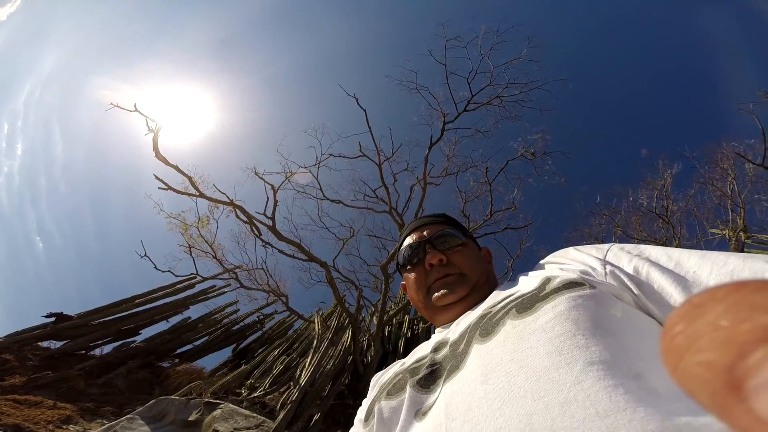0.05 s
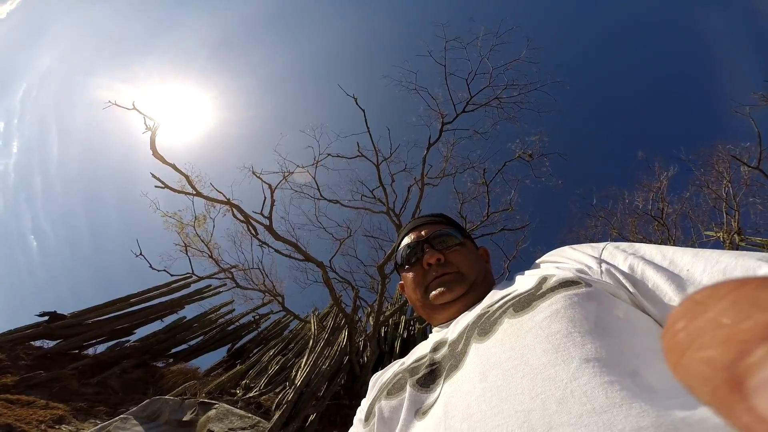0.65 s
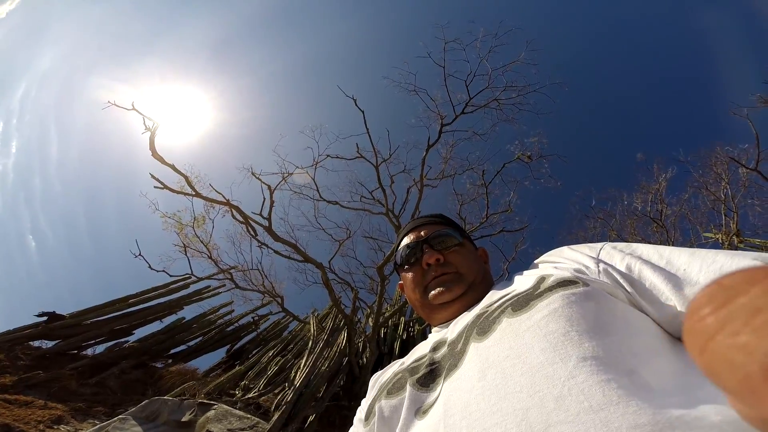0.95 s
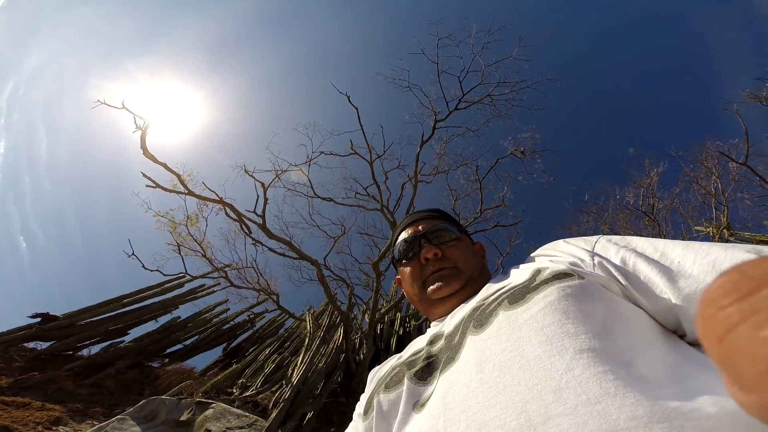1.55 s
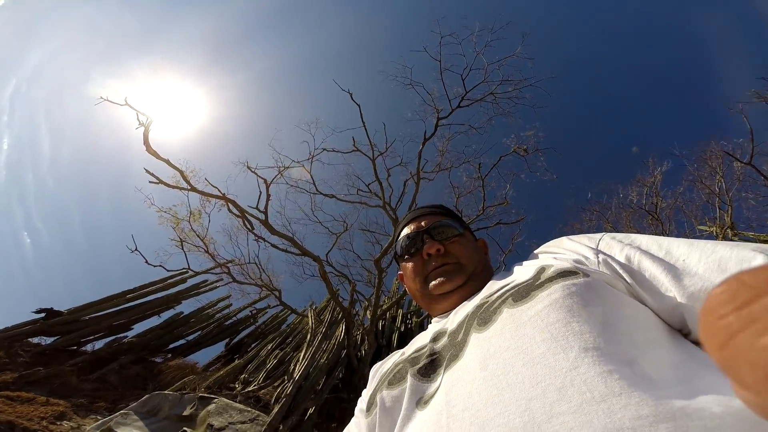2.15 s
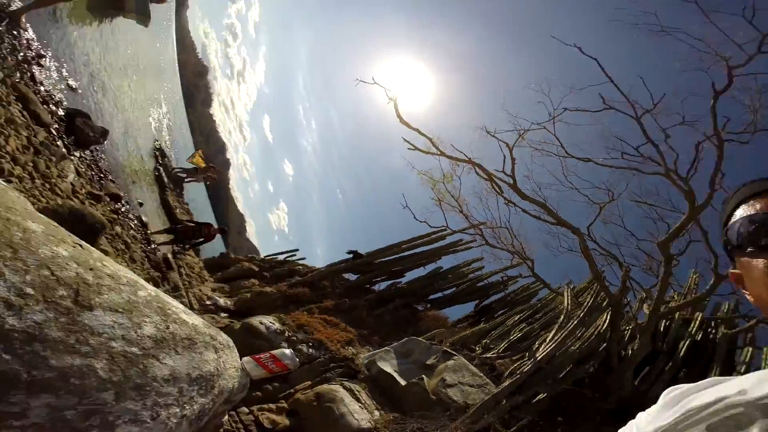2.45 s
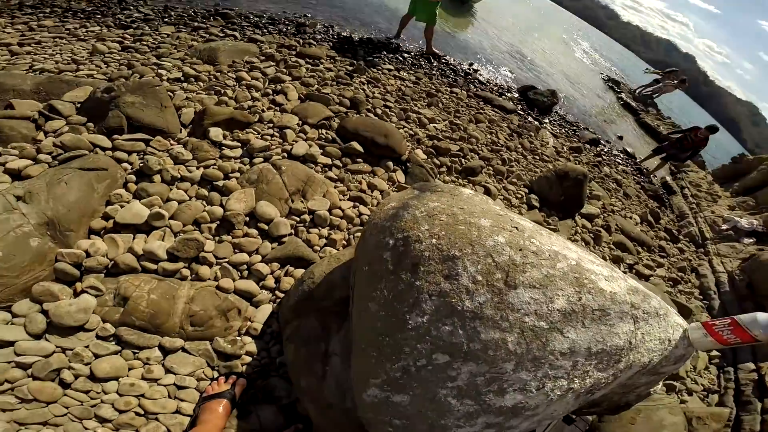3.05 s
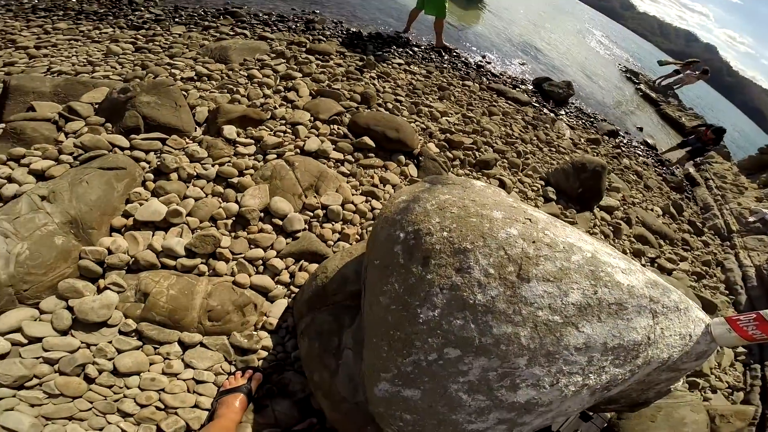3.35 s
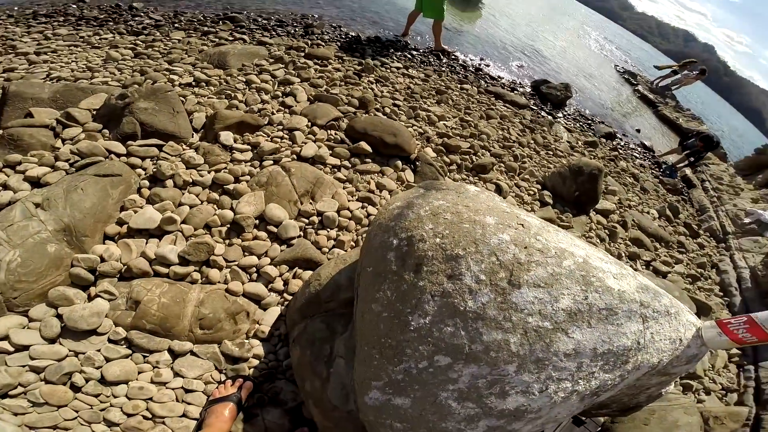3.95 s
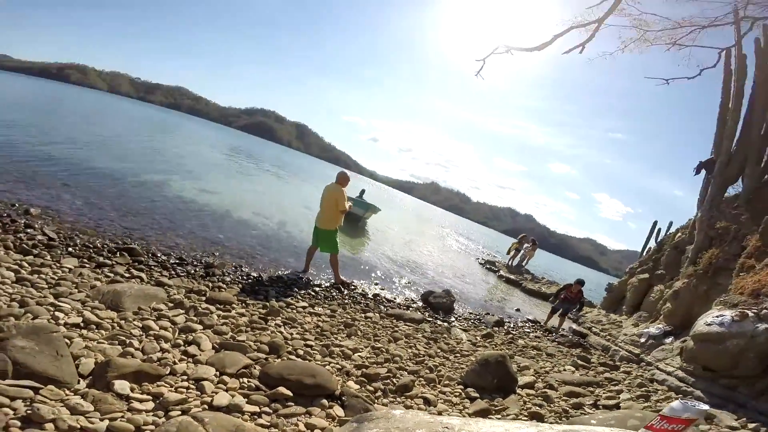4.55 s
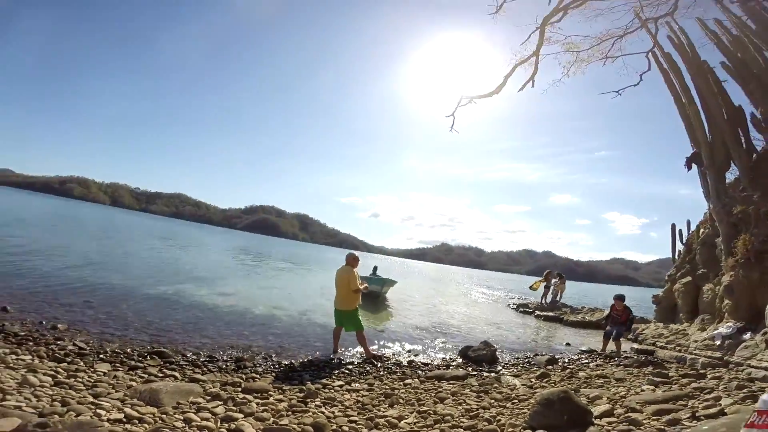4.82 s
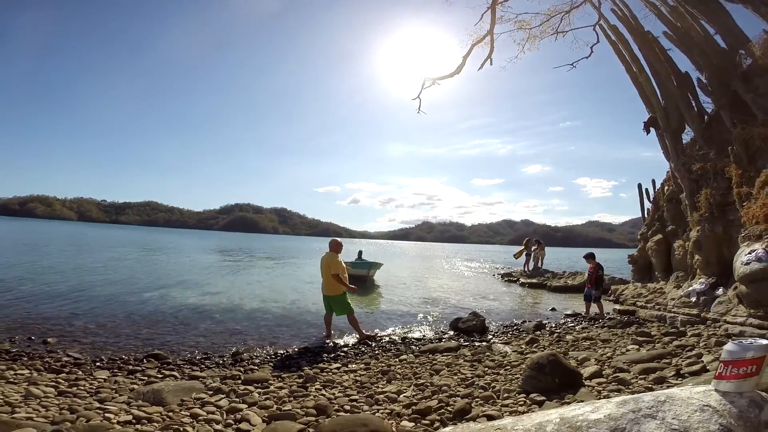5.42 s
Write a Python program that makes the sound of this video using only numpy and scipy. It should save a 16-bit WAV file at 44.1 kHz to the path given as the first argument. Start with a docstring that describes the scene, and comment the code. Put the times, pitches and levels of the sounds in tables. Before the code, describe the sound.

Fingers rub, tap and click on a handheld camera's plastic case, close and boxy, over a low rumble.

```python
"""A quiet shore: a small camera in a plastic waterproof housing is held and turned in the hand.
Fingers rub, squeak and tap on the case and its joint creaks and clicks; each rings the panels
and shakes the mount, heard through the air shut in the case. The grip adds pressure thumps.
Under it lie a low rumble, soft hiss and faint electronic whine; gain control ducks after loud knocks."""
import sys
import numpy as np
from scipy import signal
from scipy.fft import rfft, irfft, next_fast_len
from scipy.io import wavfile
from scipy.ndimage import uniform_filter1d, minimum_filter1d, map_coordinates

SR = 44100
rng = np.random.default_rng(int(sys.argv[2]) if len(sys.argv) > 2 else 0)


def generate_wav(signal):
    """Clip the signal to [-1, 1] and save it as 16-bit WAV at the path in sys.argv[1]."""
    frames = np.transpose(np.atleast_2d(signal))
    scaled = np.clip(frames, -1, 1) * 32767
    pcm = np.round(scaled).astype(np.int16)
    wavfile.write(sys.argv[1], SR, pcm)


N = 246078

# modes of the plastic walls: f/Hz, width/Hz, level/dB
WALL_MODES = [(407, 33, -30.5), (588, 68, -8), (738, 42, -2.5), (1124, 120, 5.5), (1487, 145, 3),
              (1805, 58, 3), (1994, 136, -2.5), (2310, 150, 1), (2590, 200, -5)]
# modes of the stiff corners: f/Hz, width/Hz, level/dB
CORNER_MODES = [(3074, 390, 1.5), (3440, 300, 7.5), (3580, 257, 8), (4160, 160, -3.5), (4533, 120, 0.5),
                (4900, 150, -8.5), (5556, 150, -11), (6260, 110, -6.5), (6290, 210, -9), (7280, 18, -22),
                (7370, 1100, -16), (9160, 230, -40), (10770, 820, -40.5), (13400, 2000, -35)]


def amp(db):
    """Decibels to gain."""
    return 10 ** (np.asarray(db) / 20)


def unit(x):
    """Scale to rms 1."""
    return x / np.sqrt(np.mean(x ** 2) + 1e-20)


def add(track, at_s, sound):
    """Mix a sound into a track."""
    part = track[max(round(at_s * SR), 0):][:len(sound)]
    part += sound[:len(part)]


def wobble(rate_hz):
    """Smooth random curve with knots at rate_hz."""
    knots = rng.standard_normal(int(N * rate_hz / SR) + 4)
    return map_coordinates(knots, [np.arange(N) * rate_hz / SR])


def filtered(x, response):
    """Apply a complex frequency response."""
    size = next_fast_len(len(x) + SR // 10)
    return irfft(rfft(x, size) * response(np.fft.rfftfreq(size, 1 / SR)), size)[:len(x)]


def soften(x, edge_hz, order):
    """Causal low-pass."""
    return signal.sosfilt(signal.butter(order, min(edge_hz, SR / 2 - 1), fs=SR, output="sos"), x)


def resonance(f, centre_hz, width_hz):
    """Response of one mode, 1 at its centre."""
    return 1j * f * width_hz / (centre_hz ** 2 - f * f + 1j * f * width_hz)


def resonate(force, modes, scatter_db):
    """Drive (f/Hz, width/Hz, level/dB) modes; the place of contact scatters their levels. Rms 1."""
    offset_db = rng.normal(0, 1, len(modes)) * scatter_db
    return unit(filtered(force, lambda f: sum((-1) ** k * amp(db + offset_db[k]) * resonance(f, hz, width)
                                              for k, (hz, width, db) in enumerate(modes))))


def ring(t, modes):
    """Struck (f/Hz, t60/s, level/dB) modes fade from random phases."""
    tones = sum(amp(db - 60 * t / t60_s) * np.sin(2 * np.pi * (hz * t + rng.random()))
                for hz, t60_s, db in modes)
    return tones * (1 - np.exp(-t / 0.00026))


def contact(t, decay_s, grit):
    """Force of one contact: a spike and a short crunch."""
    force = grit * rng.standard_normal(len(t)) * np.exp(-t / decay_s)
    force[0] += 1
    return force


def pressure(t, start_s, top_s, end_s):
    """Finger force through one stroke: builds to 1, then lets go."""
    return np.interp(t, np.sort([start_s, top_s, end_s]), [0, 1, 0]) ** 0.46


def rumble_and_hiss():
    """The hand-held case rumbles over the arm's deep sway, both rising in a swing; soft hiss above."""
    # noise spectrum: f/Hz, relative level/dB
    spectrum = [(12, -11.5), (20, 1), (30, -10), (97, -20.5), (128, -21.5), (328, -27.5), (433, -30),
                (511, -30.5), (674, -33), (1730, -38.5), (6010, -50), (11100, -60), (12000, -60),
                (15000, -67.5)]
    # camera swings: three corner times t/s (sorted: start, peak, end), sway rise/dB
    swings = [(2.25, 2.467, 3.35, 21.5), (3.745, 4.55, 4.5, 28), (4.572, 4.988, 9.8, 13.5)]
    t = np.arange(N) / SR
    hz, db = np.transpose(spectrum)
    colour = lambda f: amp(np.interp(np.log(f + 1), np.log(hz), db))
    low_share = lambda f: 1 / (1 + (f / 130) ** 4)
    rumble = unit(filtered(rng.standard_normal(N), lambda f: colour(f) * np.sqrt(low_share(f))))
    sway = unit(soften(filtered(rng.standard_normal(N), colour), edge_hz=35.9, order=3))
    hiss = unit(filtered(rng.standard_normal(N), lambda f: colour(f) * np.sqrt(1 - low_share(f))))
    swing_db = sum(np.interp(t, np.sort(times_s), [0, rise_db, 0]) for *times_s, rise_db in swings)
    handling = amp(0.63 * swing_db) * rumble + amp(swing_db - 9.5) * sway
    return amp(-43.5 + 1.4 * wobble(26.02)) * handling + amp(-54 + 0.6 * wobble(6.28)) * hiss


def whine():
    """Thin tones of the electronics, wavering in phase."""
    # tones: f/Hz, level/dB
    tones = [(5846, -79.5), (8780, -85), (11719, -79)]
    t = np.arange(N) / SR
    return sum(amp(db) * np.sin(2 * np.pi * hz * t + 0.3 * wobble(25)) for hz, db in tones)


def thumps():
    """The hand presses the case and lets go: one swing of pressure each."""
    # pushes: t/s, level/dB, f/Hz
    pushes = [(1.107, -32, 57), (2.401, -18.5, 250), (2.413, -15, 55), (2.438, -7.5, 21.6),
              (2.514, -13.5, 146), (2.849, -7, 23.7), (2.945, -14.5, 28), (4.28, -16.5, 26.4),
              (4.308, -16.5, 91), (4.341, -2.5, 49), (4.568, -14.5, 39)]
    out, t = np.zeros(N), np.arange(-SR // 10, SR // 10) / SR
    for at_s, db, hz in pushes:
        phase = 2 * np.pi * hz * t
        pulse = -phase / (1 + phase ** 2) ** 2
        add(out, at_s + t[0], amp(db) * pulse / pulse.max())
    return out


def rub(rise_s, fall_s, panel_hz, width_hz, panel_db, hard_db, hiss_db):
    """Skin sticks and slips on plastic: clumps of tiny grains ring a panel, the case and its mount."""
    n, clump_hz, grains_per_s = SR // 3, 150, 1600
    t = np.arange(n) / SR
    size, chance, fine = rng.standard_normal(n), rng.random(n), rng.standard_normal(n)
    clumps = amp(2.07 * np.interp(t * clump_hz, np.arange(n), rng.standard_normal(n)))
    grains = clumps * (size * (chance < grains_per_s / SR) + 0.063 * fine)
    panel = amp(panel_db) * resonate(grains, [(panel_hz, width_hz, 0)], scatter_db=0)
    skin = unit(soften(clumps * fine, edge_hz=1050, order=1))
    walls = resonate(grains, WALL_MODES, scatter_db=3)
    body = unit(soften(panel + walls + skin, edge_hz=3200, order=2))
    corners = resonate(grains, CORNER_MODES, scatter_db=5.5)
    edge = amp(hard_db) * unit(soften(corners, edge_hz=6400, order=3))
    hiss = unit(soften(clumps * grains, edge_hz=12000 * amp(0.26 * hiss_db), order=3))
    # what the panel does not take shakes the mount
    mount = amp(-2.5 - panel_db) * resonate(grains, [(221, 24, 0)], scatter_db=0)
    force = pressure(t, 0, rise_s, rise_s + fall_s)
    return amp(-1.5) * force * (body + edge + amp(hiss_db) * hiss + mount)


def rubs():
    """Finger strokes: a broad, gritty scrape."""
    # strokes: peak t/s, rise/s, fall/s, level/dB, panel f/Hz, hardness/dB, skin hiss/dB
    strokes = [(.78, 0.091, 0.041, -49, 1380, -8.5, -20), (.885, .04, .12, -52.5, 1430, -9, -18),
               (1.06, 0.058, 0.089, -54.5, 2630, -13, -11), (1.101, .03, 0.028, -42.5, 2500, -17, -7.5),
               (2.355, .04, 0.051, -46, 1650, -21, -19), (2.425, 0.026, 0.051, -33, 1760, -18.5, -12.5),
               (2.505, .04, 0.038, -36.5, 2150, -10.5, -16), (2.579, .018, 0.07, -35, 1550, -18, -26.5),
               (2.69, .075, 0.023, -27, 1314, -10.5, -16), (2.731, .025, 0.071, -39.5, 1450, -8, -21.5),
               (2.89, 0.024, 0.12, -43, 1392, -12, -34), (4.11, .025, 0.17, -41.5, 1430, -9.5, -18),
               (4.32, 0.051, 0.086, -32.5, 1290, -18, -15), (4.52, 0.099, 0.067, -36, 1270, -19.5, -20.5),
               (4.7, 0.13, 0.13, -45.5, 1240, -14.5, -17), (5.03, .04, 0.18, -53, 2043, -9, -6),
               (5.115, 0.032, .045, -39, 1274, -19, -27), (5.42, 0.17, 0.24, -56, 1670, -12.5, -12),
               (5.575, 0.056, .04, -40.5, 1500, -14, -29)]
    out = np.zeros(N)
    for top_s, rise_s, fall_s, db, hz, hard_db, hiss_db in strokes:
        scrape = rub(rise_s, fall_s, hz, width_hz=156, panel_db=-0.5, hard_db=hard_db, hiss_db=hiss_db)
        add(out, top_s - rise_s, amp(db) * scrape)
    return out


def squeaks(rise_s=0.015, fall_s=0.011):
    """A fingertip slips briefly and one panel sings out."""
    # slips: peak t/s, level/dB, panel f/Hz
    slips = [(.07, -52.5, 1690), (.267, -56, 1690), (0.791, -42.5, 1370), (0.854, -46.5, 1150),
             (1.357, -50, 1630), (1.894, -47.5, 1650), (1.961, -50.5, 1670), (2.237, -53.5, 1730),
             (2.572, -36, 1700), (4.067, -41, 1550), (5.535, -36, 1620)]
    out = np.zeros(N)
    for top_s, db, hz in slips:
        squeak = rub(rise_s, fall_s, hz, width_hz=120, panel_db=8.5, hard_db=-22.5, hiss_db=-24)
        add(out, top_s - rise_s, amp(db) * squeak)
    return out


def knock(panel_hz, panel_db, t60_s, hard_db, give_db, mount_db):
    """A blow rings a panel and the walls and rocks the mount; hardness adds corners, crack and screw."""
    # case rocking on its mount: f/Hz, t60/s, level/dB
    mount_modes = [(154, 0.11, -5.5), (224.7, 0.091, 10.5), (258, 0.04, -11), (404, 0.072, -17.5),
                   (481.5, 0.048, -12.5)]
    # steel screw of the mount: f/Hz, t60/s, level/dB
    screw_modes = [(6430, .085, 2), (7150, 0.076, -2), (8080, 0.075, -10.5)]
    t = np.arange(SR // 6) / SR
    panel = np.sin(2 * np.pi * panel_hz * t) * amp(-60 * t / max(t60_s, 0.003))
    panel *= 1 - np.exp(-t / 0.00076)
    walls = resonate(contact(t, decay_s=0.0013, grit=1.0), WALL_MODES, scatter_db=2)
    corners = resonate(contact(t, decay_s=0.0025, grit=0.18), CORNER_MODES, scatter_db=3.5)
    give = unit(np.sin(2 * np.pi * 470 * t) * amp(-60 * t / 0.0087))  # the whole face yields
    # a slacker panel is duller
    body = unit(soften(amp(panel_db) * unit(panel) + walls, edge_hz=1.56 * panel_hz, order=3))
    crack = np.diff(contact(t, decay_s=0.0021, grit=0.44), prepend=0)
    crack = unit(soften(crack, edge_hz=1670, order=2))
    screw = amp(-29) * unit(ring(t, screw_modes))
    edge = soften(corners + amp(-2) * crack, edge_hz=6650, order=3) + screw
    grip_tuning = 1 + 0.025 * rng.normal()  # the hand retunes the mount
    case = unit(body + amp(hard_db + 6.5) * edge) + amp(give_db) * give
    return amp(-22) * case + amp(mount_db - 4.5) * ring(grip_tuning * t, mount_modes)


def creaks():
    """The joint sticks and slips at a steady pace, each slip as strong as the force on it."""
    # runs of slips: start t/s, peak t/s, end t/s, gap/s, level/dB
    runs = [(4.609, 4.638, 4.662, .011, -21), (4.689, 4.719, 4.742, .014, -14.5),
            (4.748, 4.748, 4.779, .0137, -14.5)]
    out = np.zeros(N)
    for start_s, top_s, end_s, gap_s, db in runs:
        for at_s in np.arange(start_s, end_s, gap_s):
            slip = knock(panel_hz=1186, panel_db=1.5, t60_s=0.011,
                         hard_db=-27.5, give_db=-6, mount_db=-12)
            add(out, at_s, amp(db) * pressure(at_s, start_s - gap_s, top_s, end_s) * slip)
    return out


def taps():
    """Fingertips land; with more weight the face gives and the mount rocks more."""
    # landings: t/s, level/dB, weight/dB, hardness/dB
    landings = [(2.259, -34.5, -0.5, -21), (2.279, -25.5, -13, -18), (2.299, -17.5, -8, -25),
                (2.396, -28, 2.5, -32), (2.413, -17, -4, -37), (2.475, -20.5, -5, -15),
                (2.512, -5, -23, -32.5), (2.722, -21.5, -5, -16.5), (2.833, -24, -4.5, -22),
                (2.959, -26.5, -14.5, -19), (4.043, -21, -7.5, -24.5), (4.093, -25, -8.5, -17),
                (4.273, -26, -15, -19), (4.307, -20.5, -4.5, -23), (4.337, -12.5, -0.5, -24.5),
                (4.362, -17, -12, -18), (4.374, -17.5, 7, -28), (4.413, -24, -7.5, -27.5),
                (4.967, -41, -4, -33), (5.085, -24, -3.5, -22.5), (5.523, -24, -8.5, -11)]
    out = np.zeros(N)
    for at_s, db, weight_db, hard_db in landings:
        tap = knock(panel_hz=1264, panel_db=-5.5, t60_s=0.0091,
                    hard_db=hard_db, give_db=weight_db + 0.5, mount_db=weight_db - 1)
        add(out, at_s, amp(db) * tap)
    return out


def clicks():
    """The joint snaps: one panel rings clearly, the mount hardly moves."""
    # snaps: t/s, level/dB, panel f/Hz, hardness/dB
    snaps = [(2.44, -4.5, 2310, -29.5), (2.521, 0, 1650, -10.5), (2.565, -17, 1680, -37),
             (2.628, -14.5, 1190, -42), (2.652, -10, 1490, -38), (2.665, -11, 1225, -28),
             (2.689, 3.5, 1350, -11), (2.702, -1.5, 1358, -17), (2.71, -4.5, 1433, -11),
             (2.775, -5.5, 1480, -17), (2.8211, -19.5, 1490, -20.5), (2.874, -29, 1430, -37),
             (2.908, -13.5, 1263, -27), (2.936, -12.5, 1384, -17), (4.186, -3, 1434, -12),
             (4.234, -33.5, 1400, -9), (5.001, -34, 1850, -26)]
    out = np.zeros(N)
    for at_s, db, hz, hard_db in snaps:
        t60_s = 0.027 * amp(0.25 * db)  # weaker snaps die sooner
        snap = knock(hz, panel_db=6, t60_s=t60_s, hard_db=hard_db, give_db=-29, mount_db=-28.5)
        add(out, at_s, amp(db) * snap)
    return out


def air_gap(x):
    """The air between case and microphone swallows some pitches and lifts others."""
    # dips and peaks: f/Hz, width/Hz, gain/dB
    bands = [(320, 110, -8.5), (440, 100, -1), (2880, 250, -2.5), (3740, 330, -1.5), (5340, 340, -2),
             (5650, 180, 2), (5950, 290, -3), (6550, 280, 4), (7430, 800, -5), (9770, 700, -9)]
    return filtered(x, lambda f: np.prod([1 + (amp(db) - 1) * resonance(f, hz, width_hz)
                                          for hz, width_hz, db in bands], axis=0))


def scene():
    """Mono mix: contact sounds pass the air gap; thumps and background add directly."""
    contacts = clicks() + taps() + creaks() + rubs() + squeaks()
    return (air_gap(contacts) + thumps() + rumble_and_hiss() + whine())[None]


def record(dry, release_s=0.13, smooth_s=0.064, duck=3.87, ceiling=0.97, top_hz=15400):
    """Gain control ducks after loud sound and recovers; a limiter holds peaks; the band ends steeply."""
    x, t = dry[0], np.arange(N) / SR
    rms = np.sqrt(np.abs(signal.lfilter([1 / 600], [1, 1 / 600 - 1], x * x)))
    fade = np.exp(-t / release_s)
    held = np.maximum.accumulate(rms / fade) * fade  # decaying peak hold
    pole = np.exp(-1 / (smooth_s * SR))
    x = x / (1 + duck * signal.lfilter([1 - pole], [1, -pole], held))
    limiter_gain = minimum_filter1d(1 / np.maximum(np.abs(x) / ceiling, 1), size=301)
    x = x * uniform_filter1d(limiter_gain, size=301)
    return filtered(x, lambda f: f < top_hz)[None]


dry = scene()
out = record(dry)
generate_wav(out)
```